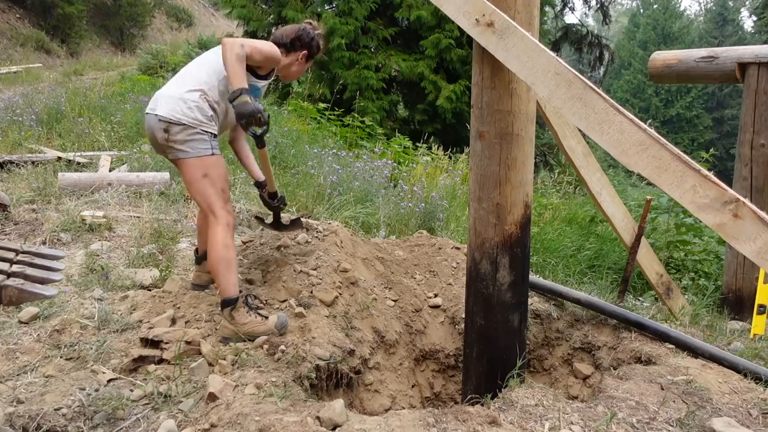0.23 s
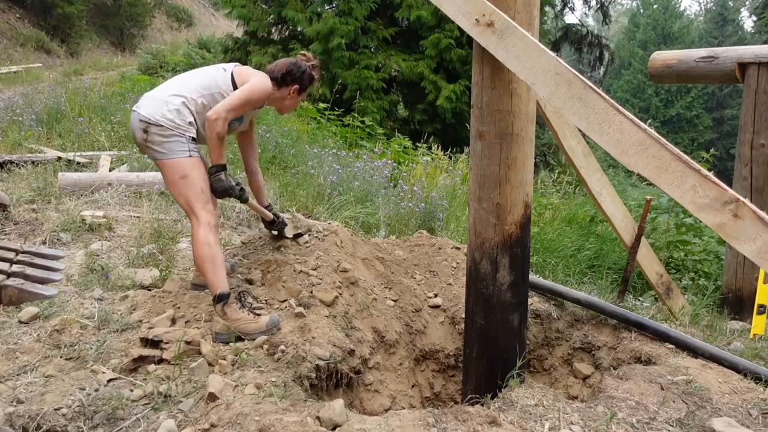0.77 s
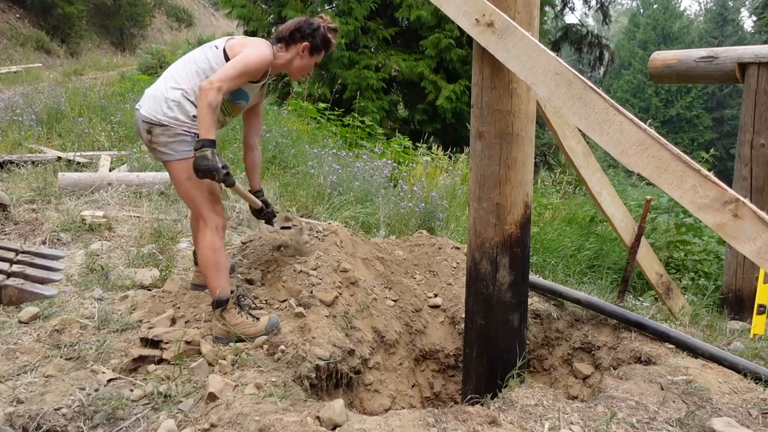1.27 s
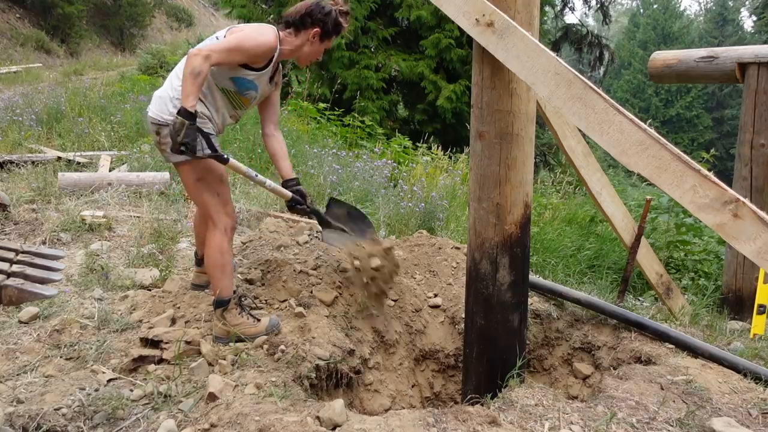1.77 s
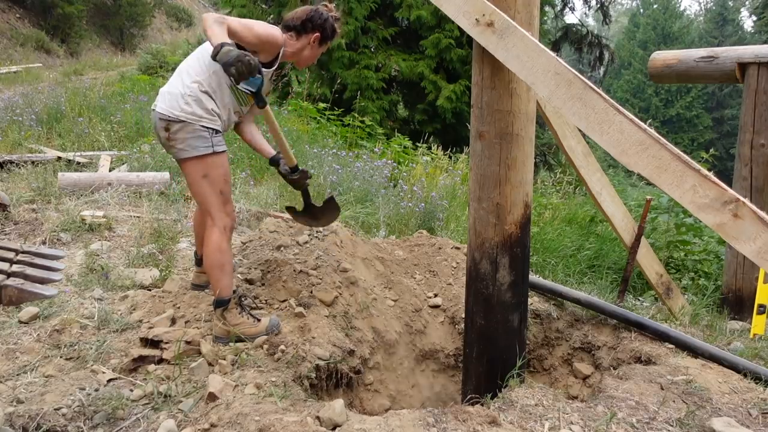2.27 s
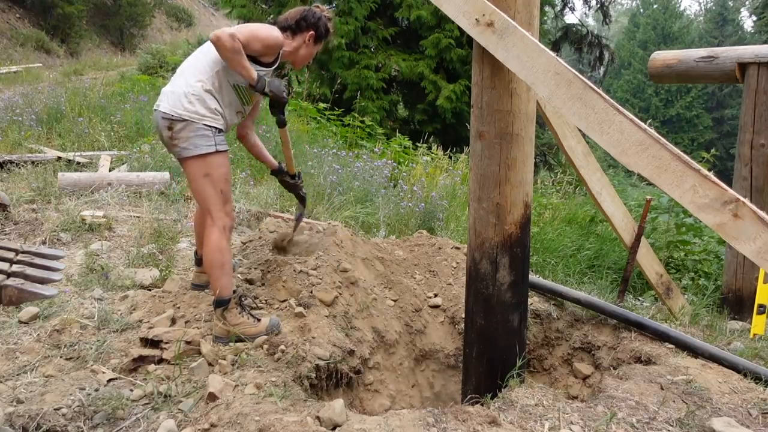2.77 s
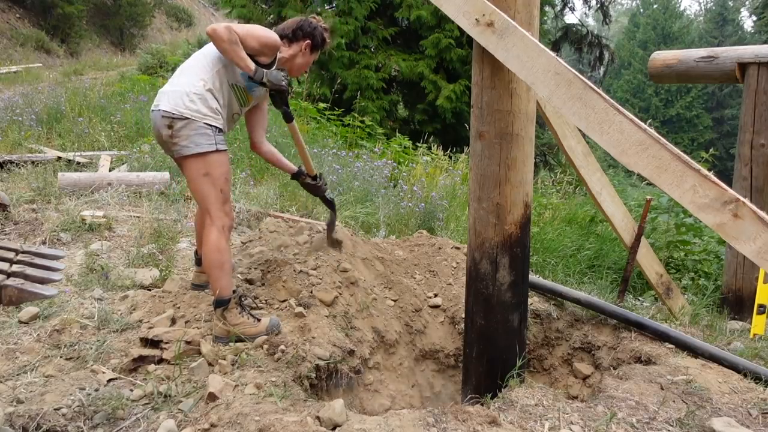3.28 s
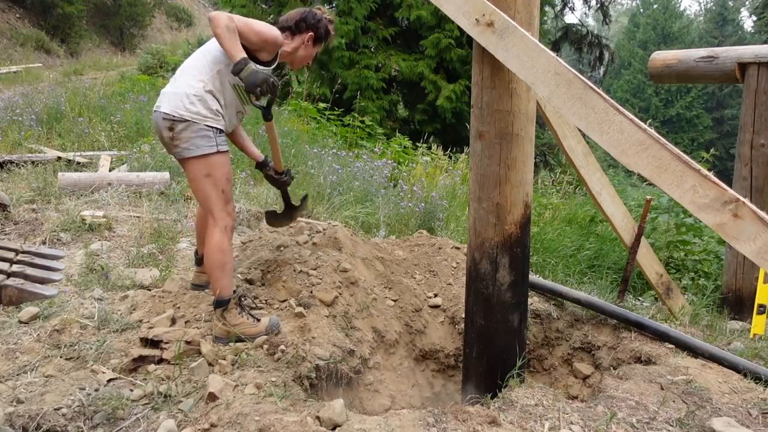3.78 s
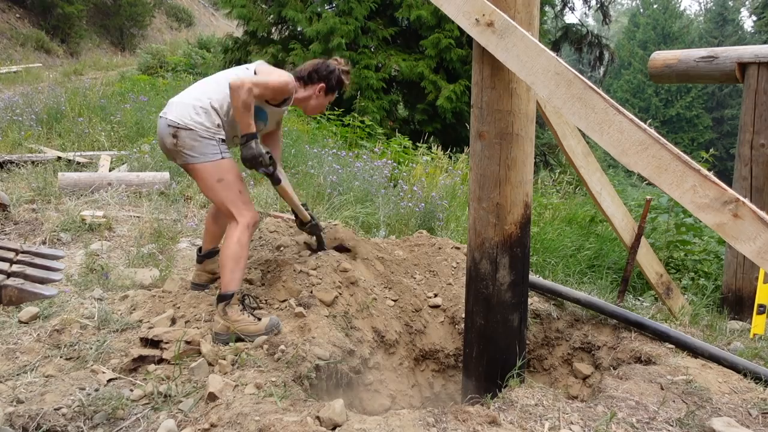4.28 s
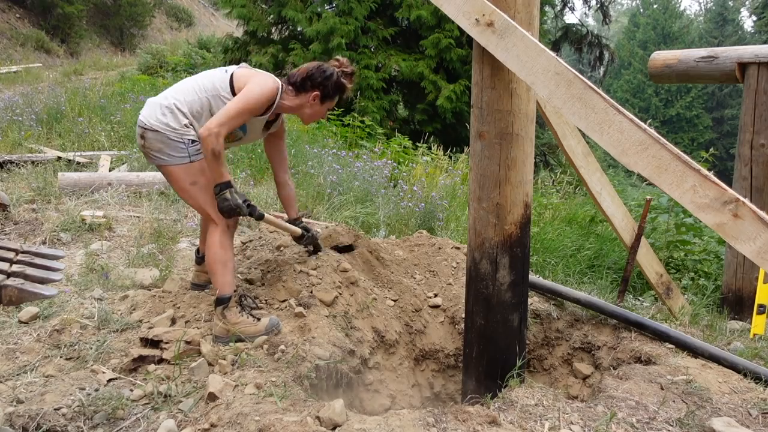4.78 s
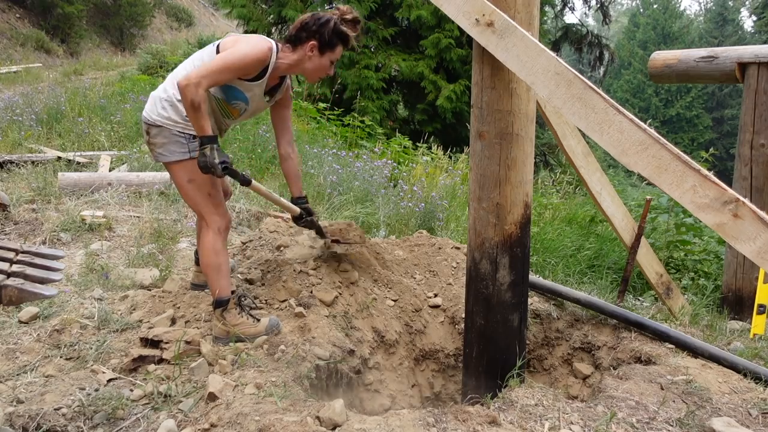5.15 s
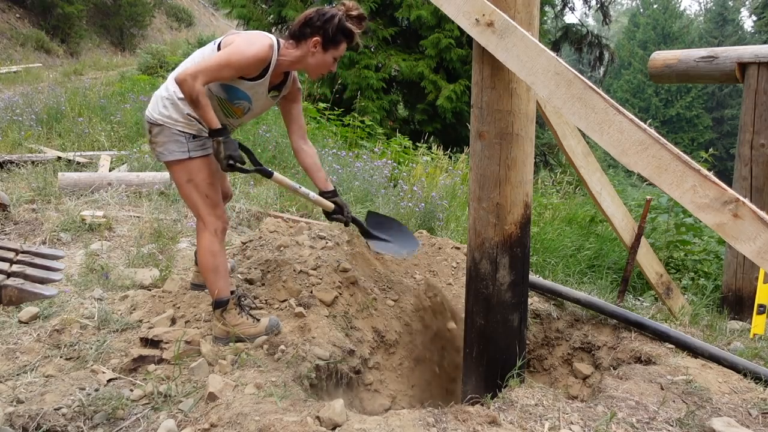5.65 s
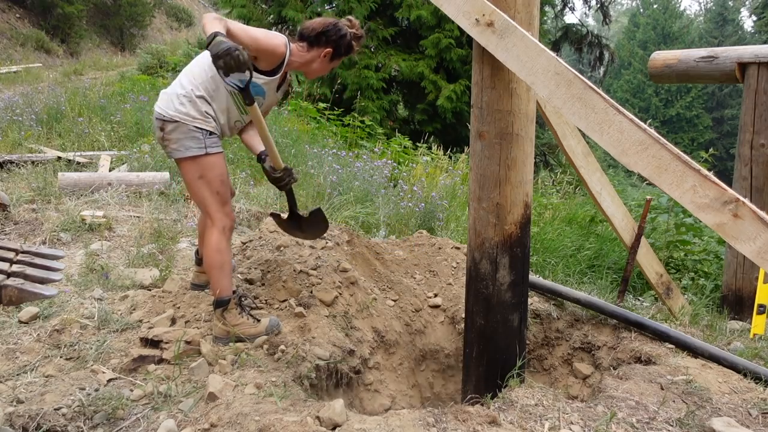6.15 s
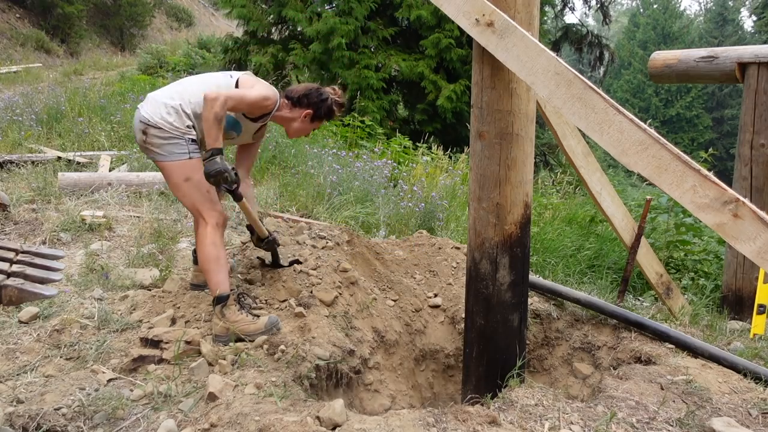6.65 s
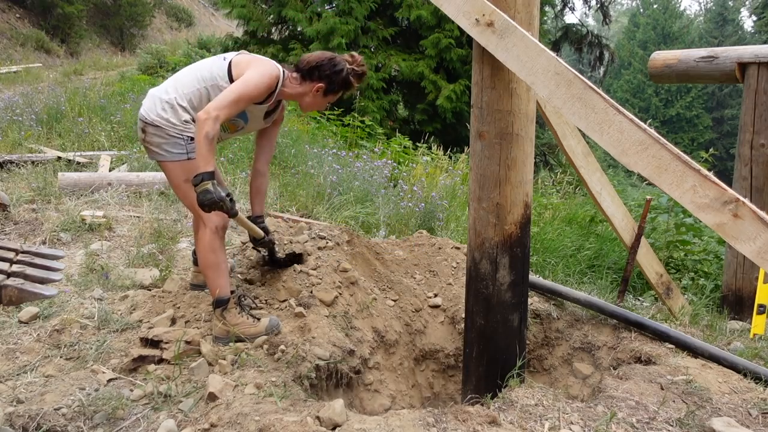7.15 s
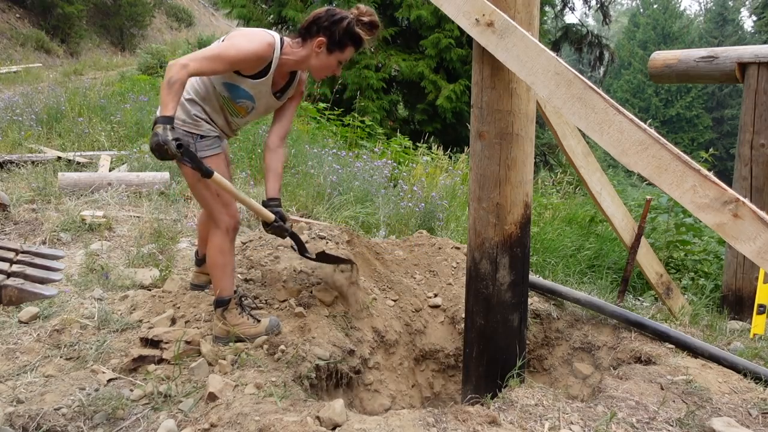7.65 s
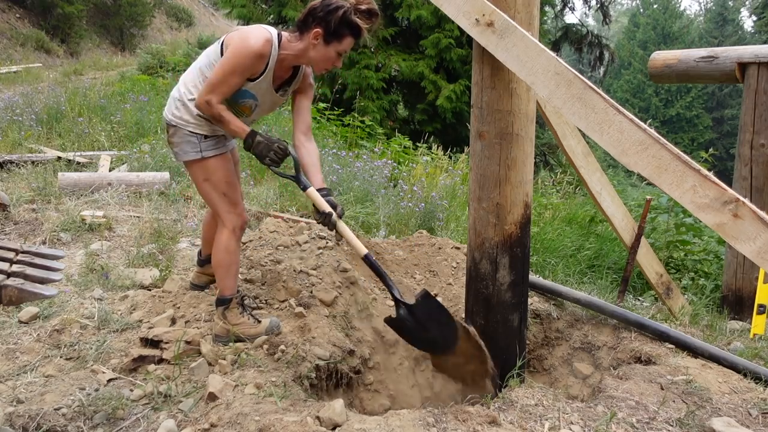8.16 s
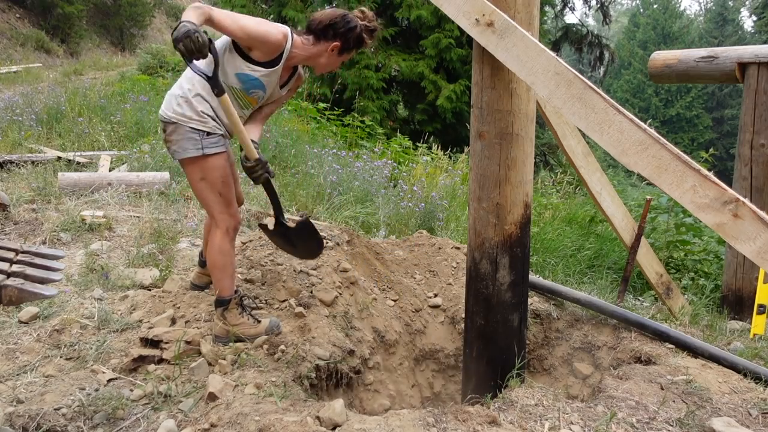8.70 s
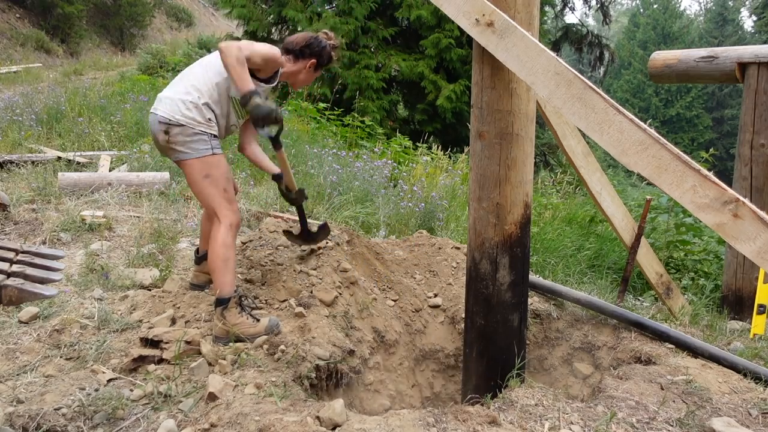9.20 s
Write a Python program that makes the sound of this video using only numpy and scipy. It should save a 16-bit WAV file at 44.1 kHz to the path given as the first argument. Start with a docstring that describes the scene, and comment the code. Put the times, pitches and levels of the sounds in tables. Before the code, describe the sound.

Outdoors, a steel shovel is stabbed into a heap of dry, stony earth with sharp, bright, gritty crunches. Small stones snap against the buried blade. Three times soil hisses off the lifted steel, which rings faintly as it empties, and clods crack, patter and thud into a hole. Loose crumbs trickle between strokes. A close, natural stereo perspective, with a quiet low outdoor rumble and the soft hiss of trees.

```python
"""A steel shovel is stabbed into a heap of dry, stony soil and tosses three loads into a post hole, outdoors.
Grit grinds on the buried blade as noisy grain impacts, and stones snap against it as short band-passed knocks.
Soil sliding off rings the free blade through its modes; clods then crack and loads patter and thud in the hole.
Behind it all, shaped stereo noise gives a low outdoor rumble and the hiss of trees."""
import sys
import numpy as np
from scipy import signal
from scipy.fft import rfft, irfft, next_fast_len
from scipy.io import wavfile
from scipy.ndimage import uniform_filter1d

SR = 44100
rng = np.random.default_rng(int(sys.argv[2]) if len(sys.argv) > 2 else 0)


def transcribe(signal):
    """Save signal, clipped to [-1, 1], as a 16-bit WAV file at the path in sys.argv[1]."""
    frames = np.atleast_2d(signal).T
    limited = np.clip(frames, -1, 1)
    pcm = np.round(limited * 32767).astype(np.int16)
    wavfile.write(sys.argv[1], SR, pcm)


N = 415863
TIME = np.arange(N) / SR

# stabs into the heap: start_s, grind_db, entry_s (time to full speed), push_s, stop_t60_s, crunch_db,
# ring_db (blade against the grinding), tip_db (peak of the tip's strike, before the stones' trim)
STABS = [(0.343, -28.5, 0.0023, 0.087, 0.27, -37, -14.5, -11.5),
         (2.618, -38.5, 0.011, 0.034, 0.14, -41, 2.5, -22),
         (3.249, -29.5, 0.0011, 0.006, 0.09, -45, -15, -15.5),
         (4.237, -28.5, 0.0015, 0.052, 0.24, -38.5, -10, -12),
         (6.446, -26.5, 0.0038, 0.062, 0.21, -36, -11, -10.5),
         (9.28, -28, 0.0026, 0.072, 0.23, -36, -21, -11.5)]
# loads landing in the hole, before the trims in falls(): start_s (first crumbs), bulk_s (bulk lands),
# patter_db, patter_swell_db (rise up to the bulk), thud_db, thud_swell_db
FALLS = [(2.047, 2.126, -39.5, 5.5, -45.5, 7), (5.682, 5.838, -44.5, 0, -43, 27),
         (8.338, 8.493, -38, 13, -50.5, 5)]


def amp(db):
    """Decibels to gain."""
    return 10 ** (np.asarray(db) / 20)


def evened(x):
    """Scales to rms 1."""
    return x / np.sqrt(np.mean(x ** 2) + 1e-20)


def read(points, hz):
    """Reads a curve of (Hz, value) points on a log-frequency axis."""
    f, value = np.transpose(points)
    return np.interp(np.log(hz + 1), np.log(f + 1), value)


def add(mix, s, sound):
    """Mixes a sound in at time s."""
    part = mix[max(round(s * SR), 0):][:len(sound)]
    part += sound[:len(part)]


def colour(x, points):
    """Shapes x with a spectrum in dB, at rms 1."""
    size = next_fast_len(len(x))
    gain = amp(read(points, np.fft.rfftfreq(size, 1 / SR)))
    return evened(irfft(rfft(x, size) * gain, size)[:len(x)])


def wander(rate, size=N):
    """Random points of rms 1, rate a second, joined by straight lines."""
    at = np.arange(size) / SR * rate
    points = np.random.default_rng(rng.integers(2 ** 31)).standard_normal(int(at[-1]) + 2)
    return evened(np.interp(at, np.arange(len(points)), points))


def grains(per_s, spread_db, clump_db, clump_rate):
    """Impacts of many small and a few large grains, stronger in some clumps than in others."""
    spread = spread_db * np.minimum(rng.exponential(1, N), 3)
    clumps = clump_db * np.tanh(wander(clump_rate))
    hits = rng.random(N) < per_s / SR
    return amp(spread + clumps) * rng.choice([-1, 1], N) * hits


def pebbles(x, patchy_db, size=256):
    """Each pebble has its own pitch, so the colour of a stream of grains shifts every few ms."""
    z = signal.stft(x, nperseg=size)[2]
    across_pitch = uniform_filter1d(rng.standard_normal(z.shape), size=8, axis=0)
    patches = evened(uniform_filter1d(across_pitch, size=2, axis=1))
    return signal.istft(z * amp(patchy_db * np.clip(patches, -2, 2)), nperseg=size)[1][:N]


def crush(x, size=70):
    """A crushed grain gives a burst of a millisecond or two instead of one clean click."""
    share = rng.integers(0, 12, N)  # which of twelve bursts each grain gives
    bursts = rng.standard_normal((12, size)) * np.linspace(1, 0, size) ** 2
    return sum(np.convolve(x * (share == k), burst)[:N] for k, burst in enumerate(bursts))


def knock(db, hz, t60, q, crumble_db, crumble_t60, size=6000):
    """A sharp broad-band snap, db at its peak, that breaks up into weaker crumbs."""
    t = np.arange(size) / SR
    fall = amp(-60 * t / max(t60, .002))
    edges = np.clip([hz / (1 + 1 / q), hz * (1 + 1 / q)], 50, .45 * SR)
    band = signal.butter(1, edges, "band", fs=SR, output="sos")
    crumbs = amp(crumble_db - 60 * t / crumble_t60) * rng.laplace(size=size)
    sound = signal.sosfilt(np.vstack([band, band]), fall * rng.choice([-1, 1], size) + crumbs)
    return amp(db) * sound / abs(sound).max()


def blade(x, damping, stiffening, thicket_db=-13, count=130):
    """The ring that impacts wake in the blade; soil packed round the steel raises and shortens it."""
    # modes of the free steel blade: pitch_hz, level_db (relative), t60_s
    modes = [(1120, -11.5, 1), (1356, -7, 0.35), (1522.5, 0.5, 0.52), (1576, -6, 0.36), (1826, -5, 0.83),
             (1895, -8, 0.28), (2070, -10, 0.91), (2445, -3.5, 0.16), (2564, -14, 0.26), (2626, -6.5, 0.7),
             (2910, -5, 0.1), (3030, -11, 0.4), (3330, -11, 0.6), (3306, -6.5, 0.2), (3490, 1.5, 0.083),
             (3750, -15, 0.26), (4240, -14, 0.14), (4550, -8.5, 0.44), (5300, -7.5, 0.44),
             (5600, -18, 0.32), (6050, 5.5, 0.059), (6500, -7, 0.17), (6940, -25, .2), (7340, -8, 0.39),
             (7628, 2, .2)]
    t = np.arange(int(.7 * SR / max(damping, 1))) / SR
    # among the strong modes lies a thicket of weak, short ones
    thicket = [(hz, thicket_db - hz / 3000, .17) for hz in rng.uniform(2700, 14000, count)]
    ring = np.zeros(len(t))
    for hz, db, t60 in [*modes, *thicket]:
        tone = np.sin(2 * np.pi * (hz * stiffening * t + rng.random()))
        ring += amp(db - 60 * t * damping / t60) * tone
    return signal.oaconvolve(x, ring / np.linalg.norm(ring))[:N]


def air(level_db=-63, rumble_waver_db=1.4, rustle_db=.3):
    """Uneven low rumble, and a hiss of trees, mostly to the left, that follows the breeze."""
    # colour of the open air: pitch_hz, level_db (relative)
    spectrum = [(15, -70), (25, -30), (92, 1.5), (137, -2.5), (170, 3), (354, 1), (384, -2), (463, -2.5),
                (575, -4.5), (714, -7), (1370, -11), (2220, -10.5), (5000, -9.5), (6740, -14.5),
                (16000, -35)]
    # left-right likeness: pitch_hz, likeness (0 to 1)
    likeness = [(60, 0.84), (180, 0.57), (550, 0.48), (1650, 0.76), (4970, 1), (15000, 1)]
    # lean to one side: pitch_hz, left_minus_right_db
    lean = [(60, 1.5), (150, 0.0), (380, 0.5), (950, 0), (2380, 2.0), (5980, 2.5), (15000, 0)]
    # the breeze in the trees: time_s, hiss_db
    gusts = [(0, 4), (1.5, 2), (5.2, 5.5), (7, 6.5), (8.8, 7), (9.43, 3.5)]
    size = next_fast_len(N)
    hz = np.fft.rfftfreq(size, 1 / SR)
    same = np.clip(read(likeness, hz), 0, 1)
    noise = rfft(rng.standard_normal((2, size)))
    mid, side = noise * np.sqrt([1 + same, 1 - same]) * amp(read(spectrum, hz))
    both = np.array([mid + side, mid - side]) * amp(np.outer([.5, -.5], read(lean, hz)))
    whole = irfft(both, size)[:, :N]
    low = irfft(both / (1 + (hz / 700) ** 4), size)[:, :N]
    breeze = amp(np.interp(TIME, *np.transpose(gusts)))
    rumble = low * amp(rumble_waver_db * wander(26))
    hiss = (whole - low) * breeze * amp(rustle_db * wander(14))
    return amp(level_db) * (rumble + hiss) / whole.std()


def outdoors(x, near_db=-24, near_t60=0.087, far_db=-30, far_t60=1.0):
    """Quick scatter from ground and post, different in each ear, and a faint dull echo from the trees."""
    t = np.arange(SR) / SR
    scatter = [(200, 12.0), (1000, 4.0), (2500, -11), (4500, 29), (8000, -49), (13000, 19)]
    near = np.array([colour(ear, scatter) for ear in rng.standard_normal((2, SR))])
    near *= amp(-60 * t / near_t60)
    far = colour(rng.standard_normal(SR), [(100, -5.0), (1500, -0.5), (5000, 4.5), (12000, -26)])
    far *= amp(-60 * t / far_t60) * np.minimum(t / 0.12, 1)
    echo = amp(near_db) * near / np.linalg.norm(near[0]) + amp(far_db) * far / np.linalg.norm(far)
    return x + signal.oaconvolve(x[None], echo, axes=1)[:, :N]


def settling(lag_s=.09):
    """The moments at which loose soil starts to settle: just after every push and every load."""
    pushes = [s + push for s, _, _, push, *_ in STABS]
    return np.add(pushes + [bulk for _, bulk, *_ in FALLS], lag_s)


def loose_grit(settle_db=-59.5, settle_t60=1.67):
    """Crumbs roll down the heap and come to rest."""
    crumbs = pebbles(grains(per_s=1500, spread_db=3, clump_db=2, clump_rate=25), patchy_db=3)
    crumbs = colour(crumbs, [(50, -29), (400, 5), (1100, 0.5), (2500, -0.5),
                             (6000, -3.5), (10000, -11.5), (16000, -12)])
    return crumbs * sum((TIME > s) * amp(settle_db - 60 * abs(TIME - s) / settle_t60) for s in settling())


def strays(first_db=-42.5, fade_db_per_s=19, run_s=.35, middle_hz=2400,
           t60=0.0075, spread_octaves=1.65, count=4):
    """A few pebbles tick down the heap each time it is stirred, the late ones fainter."""
    out, starts = np.zeros(N), np.repeat(settling(), count)
    for s, (late, pitch) in zip(starts, rng.random((len(starts), 2))):
        delay = run_s * late ** 2
        hz = middle_hz * 2 ** (spread_octaves * (2 * pitch - 1))
        db = first_db - fade_db_per_s * delay
        add(out, s + delay, knock(db, hz, t60, q=1.5, crumble_db=-32, crumble_t60=.06))
    return out


def level(loads, t60):
    """Gain of falling loads (start s, bulk s, dB, swell dB): each swells until its bulk lands, then dies."""
    gain = np.zeros(N)
    for start, bulk, db, swell_db in loads:
        short_of_full = np.interp(TIME, [start, bulk], [swell_db, 0])
        gain += (TIME > start) * amp(db - short_of_full - 60 * np.maximum(TIME - bulk, 0) / t60)
    return uniform_filter1d(gain, size=400)


def falls(patter_db=-1, thud_db=-2.5, patter_t60=0.29, thud_t60=0.41):
    """Crumbs patter into the hole while the bulk of the load lands with a dull thud."""
    # colour of the crumbs: pitch_hz, level_db (relative)
    patter_spectrum = [(25, -45), (100, -25), (250, -4.5), (800, -2.5), (2500, 5.5), (4500, 0), (8000, -5),
                       (12000, -11), (16000, -18)]
    # colour of the bulk: pitch_hz, level_db (relative)
    thud_spectrum = [(15, -50), (35, -34), (55, -13), (90, -8.5), (200, 1.5), (400, -7.5), (900, -16.5),
                     (3000, -24.5)]
    crumbs = pebbles(grains(per_s=2400, spread_db=0.5, clump_db=1.5, clump_rate=130), patchy_db=4.0)
    patter = colour(crumbs, patter_spectrum)
    thud = colour(grains(per_s=990, spread_db=0, clump_db=2.5, clump_rate=21), thud_spectrum)
    patter_gain = level([(start, bulk, db, swell) for start, bulk, db, swell, _, _ in FALLS], patter_t60)
    thud_gain = level([(start, bulk, db, swell) for start, bulk, _, _, db, swell in FALLS], thud_t60)
    return amp(patter_db) * patter_gain * patter + amp(thud_db) * thud_gain * thud


def clods(thud_db=-2.0, thud_rise=0.0051, crack_t60=.021, size=4000):
    """Lumps of dry earth crack without ringing, then slump with a soft thud a few ms later."""
    # clods that knock and collapse: start_s, peak_db, centre_hz, slump_db (before the thud_db trim)
    lumps = [(0.482, -30, 855, -58), (0.623, -43, 1810, -54), (2.054, -20.5, 2400, -37),
             (2.078, -24, 2500, -37.5), (2.117, -27, 1640, -45), (2.806, -37, 1040, -51.5),
             (3.556, -38, 1710, -60), (3.565, -31, 1590, -49), (3.593, -38.5, 1030, -67),
             (3.867, -24.5, 1360, -41), (4.349, -32.5, 780, -44), (4.481, -38.5, 1020, -49),
             (5.695, -26.5, 2130, -68), (5.712, -28, 2040, -62), (5.82, -22, 1340, -34),
             (8.177, -27, 1600, -42.5), (8.436, -29, 1310, -56), (8.471, -25.5, 3000, -57)]
    slump_spectrum = [(30, -32), (120, -3.5), (300, -5.5), (650, -1), (1500, -2), (4000, -32)]
    out, u = np.zeros(N), np.arange(size) / SR / thud_rise
    for s, db, hz, slump_db in lumps:
        add(out, s, knock(db, hz, crack_t60, q=1.4, crumble_db=-26, crumble_t60=.09))
        slump = colour(rng.standard_normal(size), slump_spectrum)
        add(out, s, amp(slump_db + thud_db) * slump * u * np.exp(1 - u))
    return out


def slides():
    """Fine soil hisses off the lifted blade; the load muffles the steel, which rings freely once it empties."""
    # soil sliding off: start_s, full_s, empty_s, level_db, ring_db (blade against the soil)
    pours = [(1.663, 1.79, 1.946, -47.5, -3.5), (5.345, 5.546, 5.64, -45.5, -3),
             (8.037, 8.223, 8.345, -40, -1)]
    # colour of the sliding soil: pitch_hz, level_db (relative)
    spectrum = [(30, -50), (200, -9.5), (900, -10), (1600, 2.5), (3000, 3), (6000, 0), (9000, -3.5),
                (12000, -5.5), (16000, -10.5)]
    flow, bare = np.zeros((2, N))
    for start, full, end, db, ring_db in pours:
        pour = amp(db) * np.sin(np.interp(TIME, [start, full, end], [0, np.pi / 2, np.pi])) ** 2
        flow += pour
        bare += amp(ring_db) * pour * np.interp(TIME, [start, full], [.5, 1]) ** 2
    sand = colour(grains(per_s=6000, spread_db=2.5, clump_db=1.5, clump_rate=120), spectrum)
    return flow * sand + blade(bare * sand, damping=1, stiffening=1)


def stones(stones_db=-1.5, ring_db=-11, tip_hz=6000, tip_t60=0.024, sharpness=0.6):
    """The tip strikes as each stab enters, and single stones snap against the soil-damped blade."""
    # stones that clink on the blade: start_s, peak_db (before the stones_db trim), centre_hz,
    # t60_s (short for a clean snap, long for a stone that crumbles)
    clinks = [(0.1496, -31, 6140, .014), (0.351, -20, 5000, .028), (0.4376, -19, 5180, .028),
              (0.498, -24, 4700, .022), (1.1737, -41, 7000, .008), (1.3367, -44, 8000, .008),
              (1.3664, -32.5, 6000, 0.0086), (2.2454, -32, 4500, .017), (2.3162, -32.5, 3130, 0.025),
              (2.6431, -20.5, 2800, 0.026), (2.9211, -22, 4300, .011), (3.2654, -20, 7900, 0.04),
              (3.3267, -28, 2560, 0.029), (3.4147, -21.5, 3240, .027), (3.8477, -32, 6660, 0.029),
              (6.5165, -10.5, 6100, 0.026), (7.4466, -33, 3010, .014), (7.599, -30.5, 5170, .01),
              (7.663, -37.5, 5640, .014), (7.9, -39.5, 4130, .012), (8.046, -35, 4100, 0.025),
              (8.1897, -21.5, 3330, 0.039), (9.3412, -22, 4270, .032)]
    out = np.zeros(N)
    tips = [(s + entry, tip_db, tip_hz, tip_t60) for s, _, entry, *_, tip_db in STABS]
    for s, db, hz, t60 in [*tips, *clinks]:
        add(out, s, knock(db + stones_db, hz, t60, sharpness, crumble_db=-25.5, crumble_t60=0.17))
    # gritty contact is too soft to excite the very top
    out = signal.sosfilt(signal.butter(2, 11500, fs=SR, output="sos"), out)
    return out + amp(ring_db) * blade(out, damping=8.7, stiffening=1.065)


def stabs(trickle_db=-28, trickle_t60=1.0, soil_lag=0.011, soil_growth=1.5):
    """Grit grinds on the blade while it is pushed in; soil crunch grows with depth; loose grit trickles after."""
    # colour of the grinding grit: pitch_hz, level_db (relative)
    grind_spectrum = [(150, -41), (700, -16), (1200, -10), (1700, -5.5), (2700, -6), (4000, -1.5),
                      (5800, 1.5), (8000, -3.5), (10000, -4), (12500, -14), (16000, -20)]
    # colour of the crunching soil: pitch_hz, level_db (relative)
    crunch_spectrum = [(25, -32), (100, -15), (250, 0), (500, 0), (850, 4), (1500, 2.5), (3000, -0.5),
                       (8000, -45)]
    grind, ring, crunch = np.zeros((3, N))
    t = np.arange(SR) / SR
    for s, db, entry, push, t60, soil_db, ring_db, _ in STABS:
        stopped = np.maximum(t - push, 0)
        slowing = amp(-60 * stopped / t60) + amp(trickle_db - 60 * stopped / trickle_t60)
        speed = np.minimum(t / max(entry, .001), 1) * slowing
        add(grind, s, amp(db) * speed)
        add(ring, s, amp(db + ring_db) * speed)
        depth = np.minimum(t / (0.69 * push), 1) ** soil_growth
        soil_stopped = np.maximum(t - push - soil_lag, 0)
        add(crunch, s, amp(soil_db - 60 * soil_stopped / (1.42 * t60)) * depth)
    crushed = crush(grains(per_s=5000, spread_db=2.0, clump_db=1.0, clump_rate=250))
    grit = colour(pebbles(crushed, patchy_db=3.0), grind_spectrum)
    soil = colour(grains(per_s=2000, spread_db=3.5, clump_db=2.0, clump_rate=140), crunch_spectrum)
    return grind * grit + blade(ring * grit, damping=7.5, stiffening=1.065) + crunch * soil


def scene():
    """The heap lies a little to the left, the hole straight ahead."""
    heap = stabs() + stones() + slides() + loose_grit() + strays()
    hole = clods() + falls()
    leftward = amp([[.25], [-.25]])
    return outdoors(heap) * leftward + outdoors(hole) + air()


def record(dry, edge_hz=16100):
    """The microphone's bass roll-off and the recorder's band limit."""
    thin = signal.sosfilt(signal.butter(4, 48, "high", fs=SR, output="sos"), dry)
    band_limit = signal.firwin(511, edge_hz, window=("kaiser", 9), fs=SR)
    return signal.oaconvolve(thin, band_limit[None], "same")


dry = scene()
out = record(dry)
transcribe(out)
```